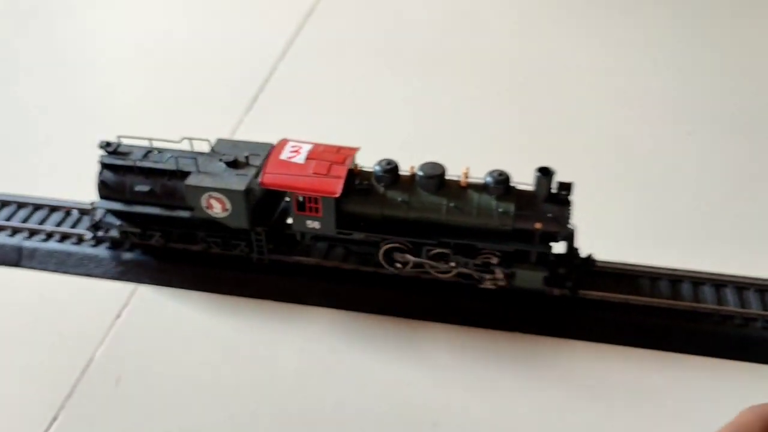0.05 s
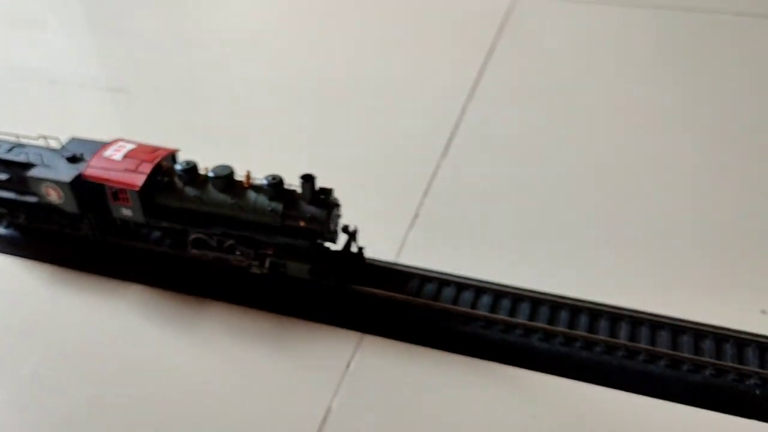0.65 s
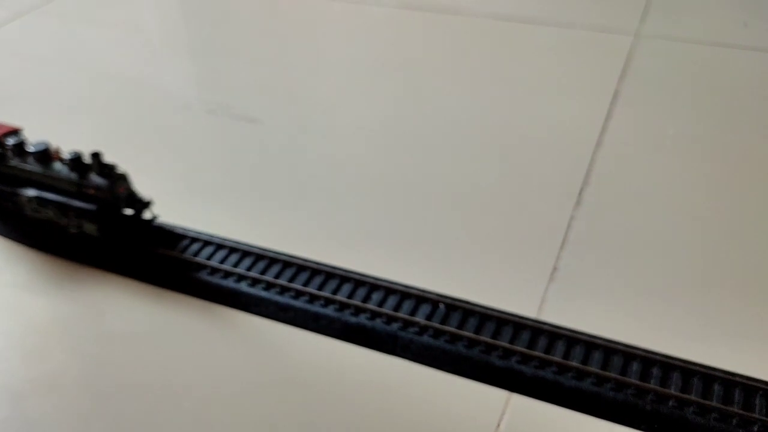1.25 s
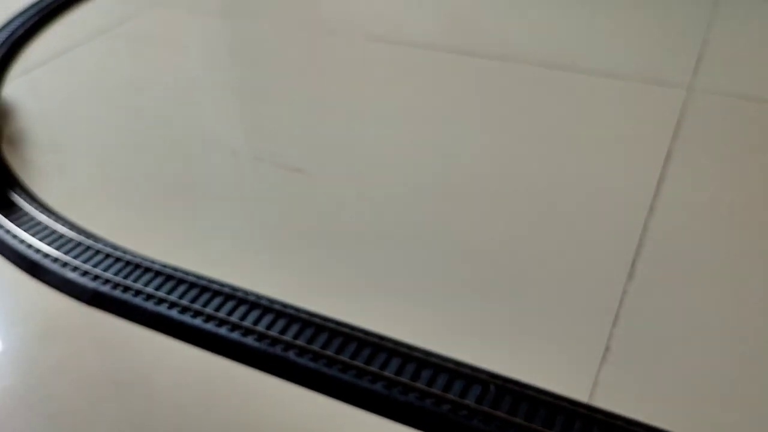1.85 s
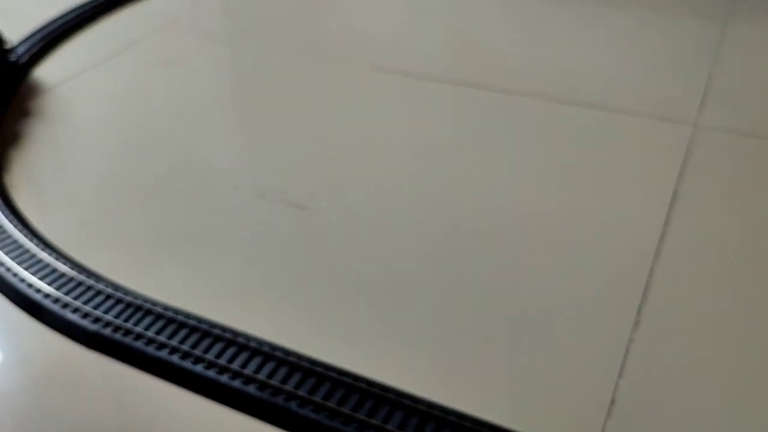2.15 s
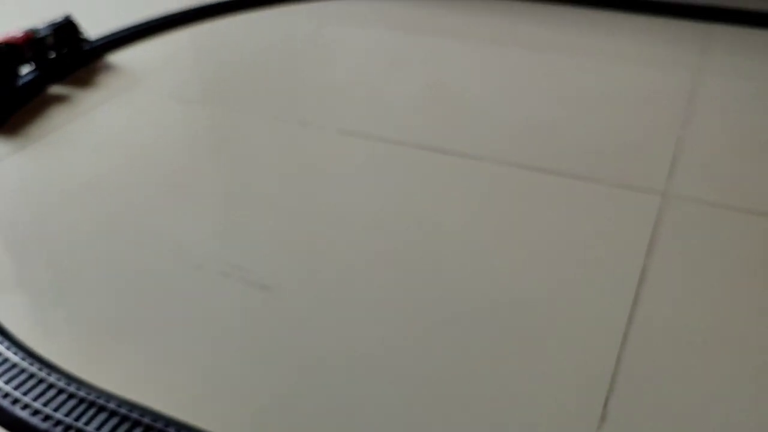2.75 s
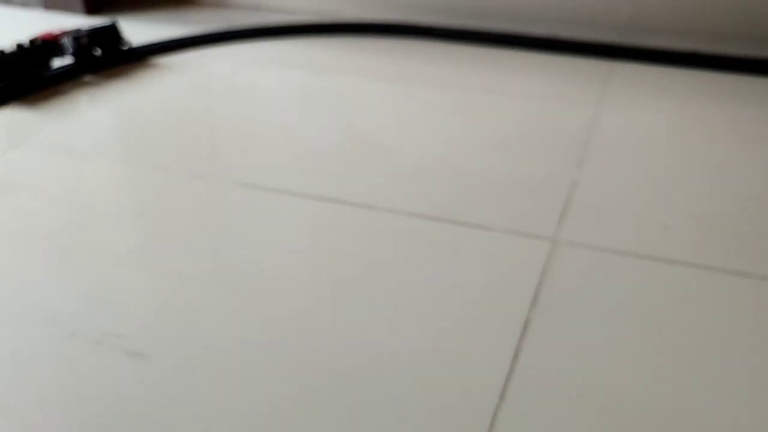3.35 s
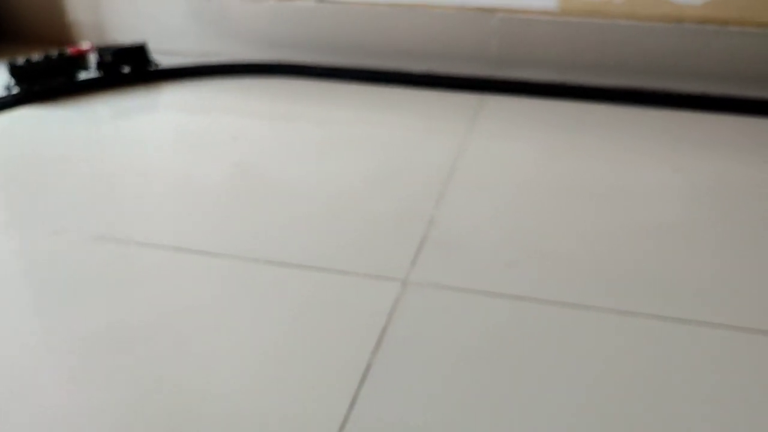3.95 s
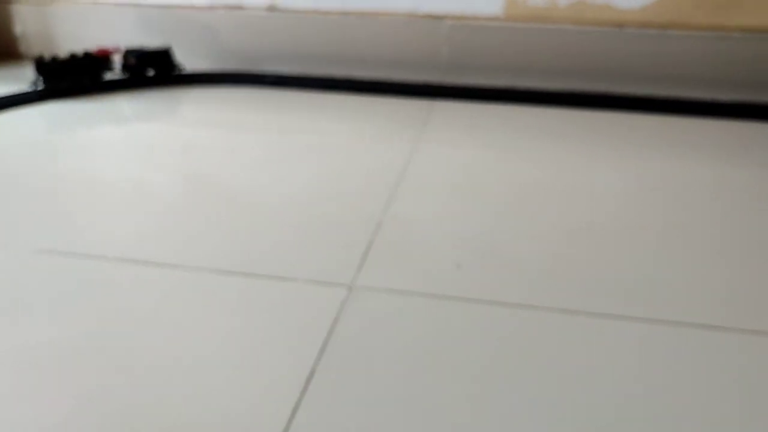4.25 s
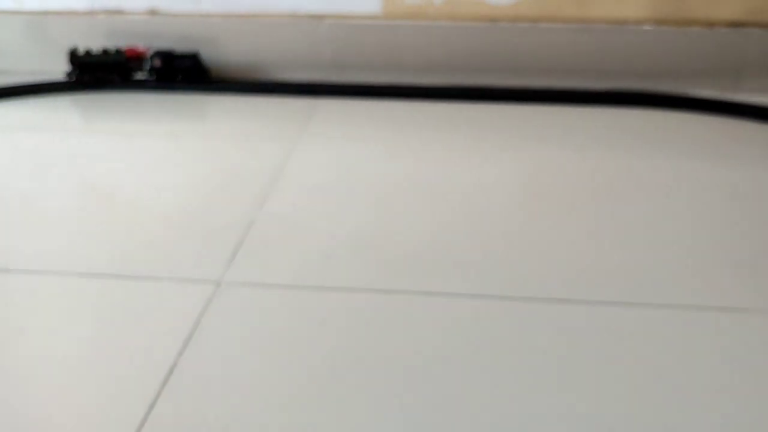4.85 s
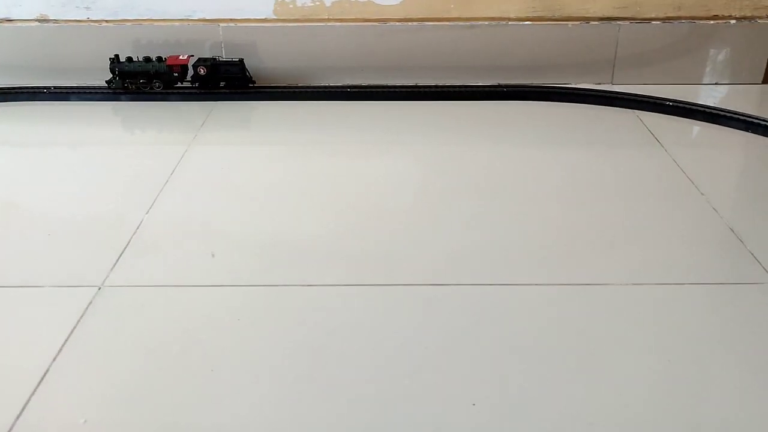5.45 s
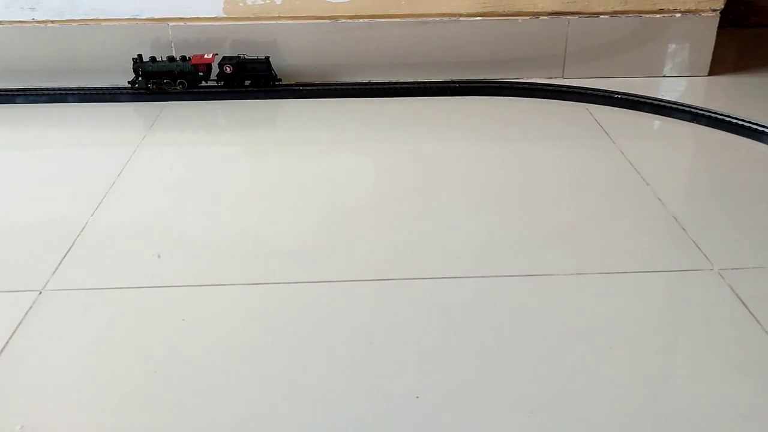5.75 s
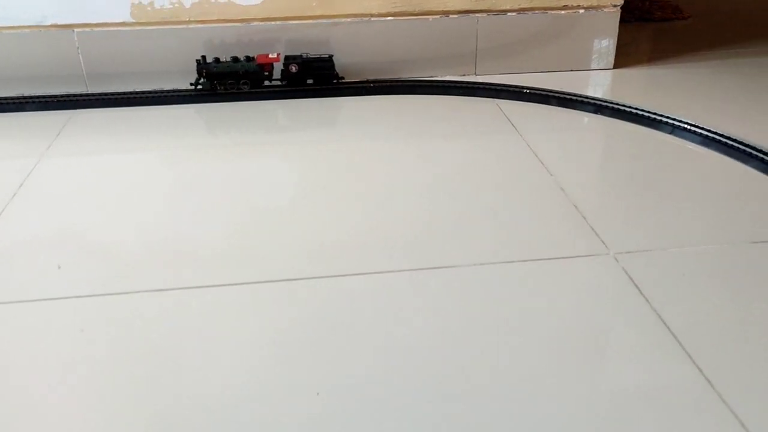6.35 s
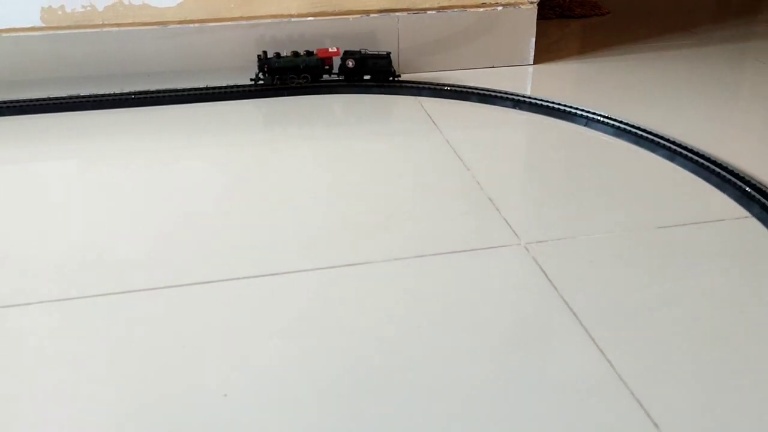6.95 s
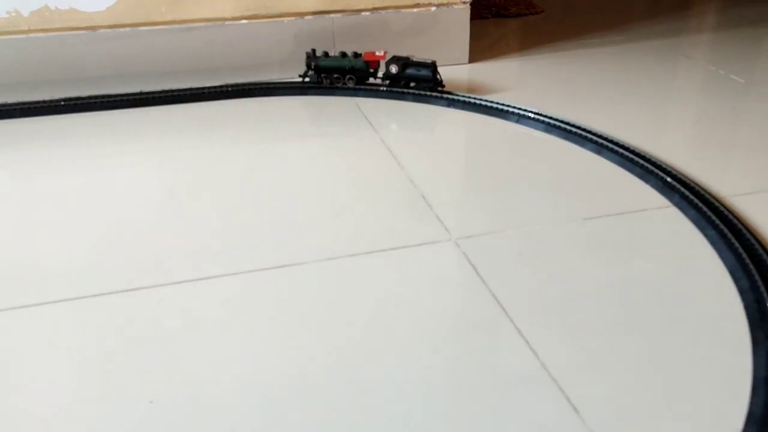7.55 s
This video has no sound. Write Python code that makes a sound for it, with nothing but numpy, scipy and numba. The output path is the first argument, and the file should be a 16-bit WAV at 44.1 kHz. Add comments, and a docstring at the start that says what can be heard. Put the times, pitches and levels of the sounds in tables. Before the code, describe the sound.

A small electric model locomotive rolls on plastic track over tiles in a bare room, rattling and scraping throughout above a faint low room rumble. For the first second or so it is close, with clustered chassis knocks, ticks at rail joints and hollow drumming from the track bed. From about 1.6 to 3.6 seconds the wheels grind through a bend, with short rasps, shudders and more ticks; thin, high rail chirps climb in pitch until about 2.7 seconds. A soft, low thud comes near 3.8 seconds. A faint gear whine begins around 3.1 seconds and turns into short, clearer spells between 4.6 and 5.5 seconds. Hollow drumming swells again near 5.9 seconds, joined by knocks and ticks from about 6.2 to 6.8. From 7 seconds the train is farther away and fainter, still rolling at the end, near 7.7 seconds.

```python
"""A small electric model steam locomotive rounds an oval of plastic track on tiles in a bare room.
Close by at first, its wheels rattle the shell and drum the hollow bed; pickups scrape, the chassis
knocks, rail joints tick. From 1.6 to 3.6 s flanges grind in the bend and the rail's chirps climb.
A soft thud follows, and the gears whine in spells until 5.5 s. Knocks and drumming return near 6.3 s;
then the train grows fainter toward the far side."""
import sys
import numpy as np
from scipy import signal
from scipy.fft import rfft, irfft, next_fast_len
from scipy.io import wavfile
from scipy.ndimage import uniform_filter1d, map_coordinates
from numba import njit

SR = 44100
rng = np.random.default_rng(int(sys.argv[2]) if len(sys.argv) > 2 else 0)


def digitize_waveform(pressure):
    """Quantize a signal to 16-bit integers and store it at the path in sys.argv[1].

    Rows of a 2-D input are taken as channels; values are limited to [-1, 1].
    """
    field = np.atleast_2d(pressure).T
    bounded = np.clip(field, -1, 1)
    quanta = np.round(bounded * 32767).astype(np.int16)
    wavfile.write(sys.argv[1], SR, quanta)


N = 340011
T = np.arange(N) / SR

# Spectra: (frequency [Hz], gain [dB])
RUMBLE_EQ = [(8.8, -40), (15, -0.5), (54, -4.5), (184, -10), (227, -12.5), (396, -19.5), (450, -12.5),
             (580, -35), (990, -120)]
AIR_EQ = [(15, 11.0), (40, -8.5), (120, -13.5), (1000, -59)]
THUD_EQ = [(30, -22), (70, -3), (110, 6), (200, -22), (600, -60)]
SCRAPE_EQ = [(1410, -15.5), (2400, -5.5), (2770, -6), (3120, -2), (4400, -8), (4930, -6), (5990, -7.5),
             (7280, -3.5), (9180, -16.5), (11700, -16.5), (13700, -23), (14400, -50)]
TICK_EQ = [(600, -32), (1500, -9), (3000, 1), (5000, -6.5), (7300, 2), (8800, -9.5), (14000, -18)]
KNOCK_EQ = [(300, -19), (700, -6), (1150, 0), (1700, 2), (2400, -3), (4000, -15), (9000, -38)]
BED_EQ = [(200, -19.5), (310, -12.5), (400, -9.5), (500, -6), (635, 2), (730, -4), (930, 3.5), (1150, -4),
          (1450, -18), (2500, -40)]
SHELL_EQ = [(500, -40.5), (850, -22), (976, -14.5), (1090, -7), (1180, -5), (1280, -2), (1410, -8),
            (1530, -4), (1690, -4.5), (1920, -3), (2370, -7), (2900, -15.5), (3770, -50), (6380, -120)]
# Channel balance: (frequency [Hz], right minus left [dB])
BALANCE_EQ = [(400, 0), (1500, 0.5), (3000, 1.5), (5500, 2.5), (7200, 4), (8000, 3.5), (8700, -5.5),
              (10000, 0.5), (14000, 1)]
# Train position: (time [s], right channel lead [samples], direct gain [dB])
POSITION = [(0, 0.84, 2), (1.2, 8.6, -1.5), (3.4, 13, 0), (6.3, 7.7, 1.5), (7.71, 4, -7)]
# Echoes off tiles, skirting and train: (delay [s], relative level [dB])
ECHOES = [(.0011, -15), (.0023, -15.5), (.0037, -12.5), (.0058, -12.5)]
# Low thud: (time [s], relative level [dB])
THUD_HITS = [(3.765, -16.5)]
# Gear whine: (start [s], end [s], relative level [dB])
WHINE_SPELLS = [(3.1, 4.6, -45.5), (4.65, 4.82, -39), (4.89, 5.07, -37.5), (5.22, 5.33, -35),
                (5.37, 5.48, -36)]
# Singing rail lengths: (start [s], end [s], first pitch [Hz], last pitch [Hz], mid level [dB])
RAIL_SPELLS = [(.2, .95, 4400, 4220, -44), (1.15, 1.55, 5000, 4700, -41.5), (1.6, 1.87, 4720, 4950, -37.5),
               (1.88, 2.12, 5020, 5200, -39.5), (2.13, 2.65, 5380, 5780, -38.5),
               (3.9, 4.35, 5060, 5060, -43), (7.3, 7.8, 5000, 5000, -46.5)]
# Body shudders, flange rasps: (start [s], end [s], centre [Hz], level [dB])
SHUDDER_BOUTS = [(0, .15, 1800, -32), (.71, .737, 1600, -29), (.95, 1.01, 1750, -30),
                 (1.382, 1.42, 1900, -35), (2.582, 2.64, 1750, -28.5), (2.67, 2.73, 1650, -30.5),
                 (2.8, 2.86, 1700, -34), (3.03, 3.085, 1620, -32), (3.19, 3.28, 1750, -35),
                 (3.887, 3.93, 1500, -30), (4.12, 4.19, 1450, -33), (4.242, 4.29, 1480, -30),
                 (4.31, 4.43, 1550, -32), (4.55, 4.663, 1600, -35), (6.34, 6.48, 1900, -34),
                 (6.77, 6.86, 1700, -38)]
RASP_BOUTS = [(.655, .68, 3700, -31), (0.707, .735, 3900, -32), (.76, .8, 3200, -35),
              (.95, 1.14, 3200, -36), (1.28, 1.35, 3200, -35), (1.925, 1.955, 2300, -33),
              (2.28, 2.37, 3300, -35), (2.448, 2.51, 3400, -36), (2.59, 2.61, 3100, -34),
              (2.675, 2.719, 3200, -33), (2.8, 2.84, 3300, -37), (3.88, 3.96, 3300, -41),
              (5.3, 6.25, 4100, -42), (6.33, 6.47, 3700, -35.5), (6.55, 6.82, 3400, -41)]
# Rail joints: (time [s], relative level [dB])
JOINT_HITS = [(0.6499, -24), (0.7634, -18), (0.771, -20.5), (1.058, -20), (1.071, -16), (1.203, -19),
              (1.7724, -17), (1.8244, -18.5), (1.9355, -17), (1.9622, -19), (2.2972, -20), (2.3275, -17),
              (2.5797, -12), (2.586, -19), (2.629, -20), (2.825, -24), (2.9426, -28), (3.017, -21),
              (4.1704, -21), (6.337, -18.5), (6.359, -21), (6.424, -23), (6.4428, -19)]
# Chassis knocks: (time [s], relative level [dB], track ring [Hz])
CHASSIS_HITS = [(0.116, -13, 1270), (0.303, -15.5, 900), (0.372, -15, 1000), (0.387, -11.5, 1100),
                (0.462, -10, 1150), (0.473, -11, 1150), (0.482, -9, 1100), (0.601, -14, 1150),
                (0.634, -15, 1050), (0.651, -13, 1100), (0.711, -10, 1000), (0.718, -10, 1300),
                (0.731, -14, 1400), (0.766, -14.5, 1900), (0.952, -15, 1600), (0.972, -7.5, 1270),
                (1.001, -14, 1600), (1.022, -15, 1250), (1.064, -11, 1240), (1.074, -9, 1260),
                (1.937, -11, 1500), (2.5803, -8.5, 1700), (2.587, -14, 1700), (2.629, -14, 1700),
                (3.026, -14, 1600), (3.147, -15, 1580), (4.245, -11, 1400), (6.225, -16, 900),
                (6.335, -17, 850), (6.361, -16, 1000), (6.445, -13, 1000), (6.701, -16, 1050),
                (6.774, -17, 980)]
# Hollow stretches of bed: (start [s], end [s], level [dB])
HOLLOW_SPANS = [(-.05, 0.718, -35), (0.233, .5, -32.5), (0.89, 1.415, -40.5), (3.38, 3.6, -40),
                (5.344, 5.752, -40), (5.868, 6.53, -33.5), (6.548, 6.937, -36.5), (7.047, 7.8, -43.5)]
# Track resonance, set by how it lies: (time [s], centre [Hz], width [Hz], level re shell [dB])
TRACK_MODE = [(0, 1190, 420, -3.5), (.45, 1160, 340, 1), (.8, 1110, 300, -4.5), (1.1, 1220, 260, -2),
              (1.5, 1290, 520, -7.5), (2.3, 1390, 480, -2.5), (2.9, 1560, 620, -7), (3.05, 1580, 240, -2),
              (3.28, 1590, 220, 0), (3.5, 1240, 400, -8.5), (4.3, 1400, 460, -1), (5.1, 1390, 450, -5.5),
              (6.2, 860, 600, -9), (6.8, 1030, 600, -1), (7.05, 1260, 400, -6), (7.71, 1280, 460, -.5)]
# Rolling, fainter with distance: (time [s], relative shell level [dB], relative scrape level [dB])
ROLLING_LEVELS = [(0, -29, -31), (.85, -31, -32), (1.1, -30, -31.8), (1.6, -30.5, -30.7), (2.6, -31, -32.5),
                  (3.65, -31.5, -33.5), (4.35, -29.5, -34), (4.8, -31.5, -33.5), (6.45, -33, -34),
                  (6.8, -32.5, -34.5), (7.15, -35, -38.5), (7.71, -34.5, -39)]

WHEEL_HZ, MOTOR_HZ, MESH_HZ = 3.14, 43.2, 1073
SOUND_M_PER_S = 343


def undb(db):
    """Decibels to gain."""
    return 10 ** (np.asarray(db) / 20)


def unit(x):
    """Scale to rms 1."""
    return x / np.sqrt(np.mean(x ** 2))


def curves(table):
    """Per-sample values of each column after time."""
    times_s, *columns = np.transpose(table)
    return [np.interp(T, times_s, column) for column in columns]


def stretch(start_s, end_s, fade_s):
    """Gate with linear fades."""
    return np.clip(np.minimum(T - start_s, end_s - T) / fade_s + .5, 0, 1)


def walk(rate_hz):
    """Smooth random drift, rms 1."""
    hold = int(SR / rate_hz)
    steps = np.repeat(rng.standard_normal(N // hold + 1), hold)
    return unit(uniform_filter1d(uniform_filter1d(steps, hold), hold)[:N])


def colour(x, eq, size=4096):
    """Minimum-phase filter with the given spectrum."""
    hz, db = np.transpose(eq)
    bins_hz = np.maximum(np.fft.rfftfreq(size, 1 / SR), 1)
    cepstrum = irfft(np.log(undb(np.interp(np.log(bins_hz), np.log(hz), db))))
    cepstrum[1:size // 2] *= 2
    cepstrum[size // 2 + 1:] = 0
    response = np.array(irfft(np.exp(rfft(cepstrum))), ndmin=x.ndim)
    return signal.oaconvolve(x, response, axes=-1)[..., :N]


@njit
def resonance(x, hz, width_hz):
    """State-variable band-pass; centre and width move."""
    y, band_state, low_state = np.empty(len(x)), 0., 0.
    for i in range(len(x)):
        g, damping = np.tan(np.pi * hz[i] / SR), width_hz[i] / hz[i]
        band = (band_state + g * (x[i] - low_state)) / (1 + g * (g + damping))
        band_state = 2 * band - band_state
        low_state += 2 * g * band
        y[i] = damping * band
    return y


def ring(x, hz, width_hz):
    """Two band-passes in series per channel, rms 1."""
    width_hz = np.ones(N) * width_hz
    rung = np.array([resonance(resonance(channel, hz, width_hz), hz, width_hz) for channel in x])
    return unit(rung / np.sqrt(width_hz))


def patter(rate_hz, spread_db):
    """Tiny random impacts, a few much harder than the rest."""
    hit = rng.random(N) < rate_hz / SR
    size = undb(spread_db * np.minimum(rng.exponential(size=N), 4))
    return unit(hit * size * rng.choice([-1, 1], N))


def blows(table, decay_s, chatter):
    """One contact per row, then decaying rebounds."""
    out, t = np.zeros(N + SR // 10), T[:SR // 10]
    for time_s, db in table:
        push = chatter * rng.standard_normal(len(t)) * np.exp(-t / decay_s)
        push[0] += 1
        start = int(time_s * SR)
        out[start:start + len(t)] += undb(db) * push / np.linalg.norm(push)
    return out[:N]


def bouts(impacts, table, width_hz):
    """Impacts ring a broad resonance in gated bouts."""
    hz, = curves(sorted(((start + end) / 2, centre) for start, end, centre, _ in table))
    gain = sum(undb(db) * stretch(start, end, fade_s=.02) for start, end, _, db in table)
    return ring(impacts, hz * (1 + 0.049 * walk(35)), width_hz) * gain


def diffuse(spacing_m=0.09, bass_coherence=0.71):
    """Noise from all sides: channels alike in the bass, unrelated above."""
    size = next_fast_len(N, real=True)
    bins_hz = np.fft.rfftfreq(size, 1 / SR)
    coherence = bass_coherence * np.sinc(2 * bins_hz * spacing_m / SOUND_M_PER_S)
    mid, side = (irfft(rfft(rng.standard_normal(size)) * np.sqrt(1 + sign * coherence), size)[:N]
                 for sign in (1, -1))
    return unit(np.array([mid + side, mid - side]))


def room(impacts, direct_db, tail_db, early_s=0.0085, t60_s=0.52, pan_db=0.14):
    """Impacts arrive on the right first; their echoes merge into decaying noise."""
    lag, near_db = curves(POSITION)
    direct_gain = undb(direct_db + near_db)
    left = map_coordinates(impacts, [np.arange(N) - lag], order=3)
    direct = direct_gain * np.array([left, impacts])
    t = T[:SR // 2]
    decay = np.exp(-2 * t / early_s) + undb(tail_db - 60 * t / t60_s) ** 2  # floor, then walls
    energy = np.abs(signal.oaconvolve(impacts ** 2, decay / decay.sum())[:N])
    heard = (direct + np.sqrt(energy) * diffuse()) / np.sqrt(1 + direct_gain ** 2)
    return heard * undb(np.array([[pan_db], [-pan_db]]) / 2)


def reflect(x, drift_s=0.000252):
    """Short echoes comb the sound; paths drift as the train moves."""
    out, power = x.copy(), 1
    for delay_s, db in ECHOES:
        path_s = delay_s + drift_s * walk(2.2)
        for channel in range(2):
            lag = (path_s + rng.uniform(-.00015, .00015)) * SR
            out[channel] += undb(db) * map_coordinates(x[channel], [np.arange(N) - lag], order=2)
        power += undb(db) ** 2
    return out / np.sqrt(power)


def background():
    """Low room rumble and air flutter."""
    rumble = unit(colour(diffuse(), RUMBLE_EQ))
    air = unit(colour(rng.standard_normal((2, N)), AIR_EQ))
    return undb(-46.5) * rumble + undb(-42) * air


def thud():
    """One soft, low blow."""
    return undb(30.5) * colour(blows(THUD_HITS, decay_s=0.037, chatter=.1), THUD_EQ)


def gears(floor_db=-50):
    """Mesh tone flutters with load; loose teeth rattle around it."""
    spells = sum(undb(db) * stretch(start, end, fade_s=0.04) for start, end, db in WHINE_SPELLS)
    hz = MESH_HZ * (1 + 0.006 * walk(25) + 0.014 * walk(180))
    phase = 2 * np.pi * np.cumsum(hz) / SR
    tone = np.array([np.sin(phase + 0.71 * walk(2.87)) for _ in range(2)]) * undb(4.5 * walk(60))
    teeth = ring(diffuse(), hz * 1.02, width_hz=120)
    return (undb(-2.0) * unit(tone) + undb(-3.0) * teeth) * (undb(floor_db) + spells)


def contact_force(rod_hz=8.0, heavy_side_down_s=0.0898):
    """Wheel load rocks each turn, nods with the rods, flutters with the motor shaft."""
    speed = 1 + 0.01 * walk(2.45)
    rad_per_hz = 2 * np.pi * (np.cumsum(speed) / SR - heavy_side_down_s)
    rock_db = 0.3 * np.cos(WHEEL_HZ * rad_per_hz) + 0.12 * np.cos(rod_hz * rad_per_hz)
    return unit(undb(rock_db + np.sin(MOTOR_HZ * rad_per_hz) + 0.57 * walk(60)))


def rails(force, chirp_hz=12.8, chirp_peak_s=2.15, bend_s=(1.64, 3.62), ease_db_per_s=2.5):
    """Rubbed rail sings in sagging chirps; flanges grind lower, easing through the bend."""
    rub = room(patter(2500, 2.4) * force, direct_db=0.5, tail_db=-20)
    hz, = curves([point for start, end, first, last, _ in RAIL_SPELLS
                  for point in ((start, first), (end, last))])
    chirp_cycles = (chirp_hz * (T - chirp_peak_s) + .5) % 1 - .5
    pulse = undb(5.5 * np.cos(2 * np.pi * chirp_cycles))
    sing = ring(rub, hz * (1 - 0.04 * chirp_cycles), width_hz=220) * pulse
    sing_gain = sum(undb(db) * stretch(start, end, fade_s=0.07) for start, end, _, _, db in RAIL_SPELLS)
    grind = ring(rub, 2310 * (1 + 0.027 * walk(5.4)), width_hz=630)
    grind_gain = stretch(*bend_s, fade_s=0.13) * undb(-31.5 - ease_db_per_s * (T - bend_s[0]))
    return unit(sing) * sing_gain + grind * grind_gain


def scrape(force):
    """Treads and pickups scratch the rails; loose rods add sparse clicks."""
    grit = patter(4000, 2.8) * undb(0.87 * walk(90))
    clicks = undb(-8.5) * patter(45, 2.4)
    return unit(colour(room((grit + clicks) * force, direct_db=-6.5, tail_db=-10), SCRAPE_EQ))


def clatter(force):
    """Loose body shudders on uneven track; flanges catch the rail and rasp."""
    rattle = room(patter(700, 2.6) * force, direct_db=-4, tail_db=-13)
    grit = room(patter(900, 2.0) * force, direct_db=-1, tail_db=-12)
    return bouts(rattle, SHUDDER_BOUTS, width_hz=840) + bouts(grit, RASP_BOUTS, width_hz=1500)


def joint_ticks():
    """Wheels strike rail joints."""
    contacts = blows(JOINT_HITS, decay_s=0.0024, chatter=0.33)
    return undb(26) * colour(room(contacts, direct_db=-2.5, tail_db=-16, early_s=0.007), TICK_EQ)


def chassis_knocks(ring_width_hz=220.):
    """Chassis drops onto the rails: shell clacks, track piece rings."""
    contacts = blows([(time_s, db) for time_s, db, _ in CHASSIS_HITS], decay_s=0.005, chatter=.18)
    hits = room(contacts, direct_db=2, tail_db=-13, early_s=0.007)
    hz, = curves([(time_s, centre) for time_s, _, centre in CHASSIS_HITS])
    track = np.array([resonance(channel, hz, np.full(N, ring_width_hz)) for channel in hits])
    return undb(22) * colour(hits, KNOCK_EQ) + undb(25) * track


def bed(force, rolling_db, throb_hz=9.65):
    """Track bed drums on the tiles, louder over hollow stretches."""
    drum = unit(colour(room(patter(2500, 1.6) * force, direct_db=2, tail_db=-15), BED_EQ))
    firm_power = undb(rolling_db - 11.5) ** 2
    hollow_power = sum((undb(db) * stretch(start, end, fade_s=0.11)) ** 2
                       for start, end, db in HOLLOW_SPANS)
    throb = undb(0.5 * np.cos(2 * np.pi * throb_hz * T))
    return drum * np.sqrt(firm_power + hollow_power) * throb


def shell(force):
    """Wheels and gear teeth rattle the plastic body and ring the track piece below."""
    hz, width_hz, track_db = curves(TRACK_MODE)
    body = colour(room(patter(1800, 2.8) * force, direct_db=-8, tail_db=-10), SHELL_EQ)
    track_hits = room(patter(1500, 2.2) * force, direct_db=-2, tail_db=-17)
    track = ring(track_hits, hz * (1 + 0.022 * walk(13)), width_hz)
    return (unit(body) + undb(track_db) * track) / np.sqrt(1 + undb(track_db) ** 2)


def scene():
    """Locomotive, track and room, in stereo."""
    shell_db, scrape_db = curves(ROLLING_LEVELS)
    force = contact_force()
    jolts = force * undb(0.57 * walk(16))  # uneven track
    body = shell(jolts) * undb(shell_db + 3.0) + bed(jolts, shell_db)
    wheels = scrape(force) * undb(scrape_db + 2.5) + rails(force)
    strikes = joint_ticks() + chassis_knocks()
    low_thud = thud()
    return reflect(body + wheels + clatter(force) + strikes) + gears() + low_thud + background()


def record(dry, cutoff_hz=14450):
    """Opposite EQ per channel, then a steep low-pass."""
    channels = [colour(x, [(hz, sign * db / 2) for hz, db in BALANCE_EQ])
                for x, sign in zip(dry, (-1, 1))]
    return signal.sosfilt(signal.ellip(10, .2, 80, cutoff_hz, fs=SR, output="sos"), channels)


dry = scene()
out = record(dry)
digitize_waveform(out)
```